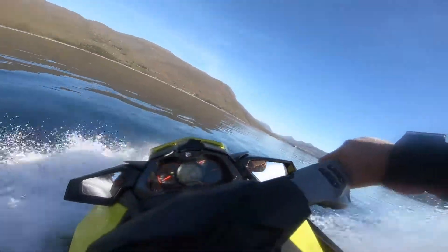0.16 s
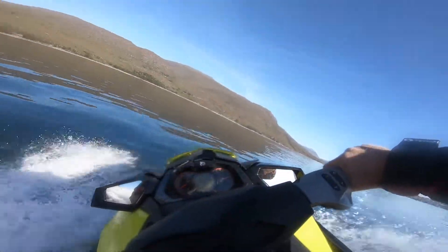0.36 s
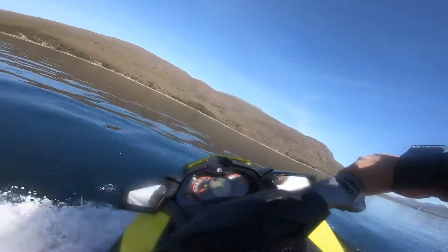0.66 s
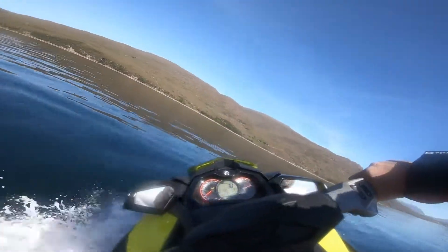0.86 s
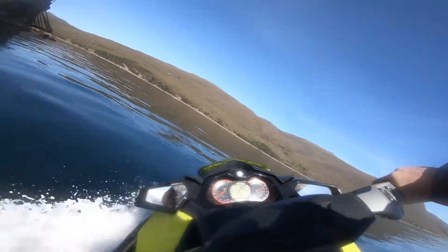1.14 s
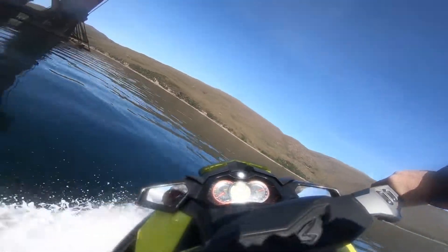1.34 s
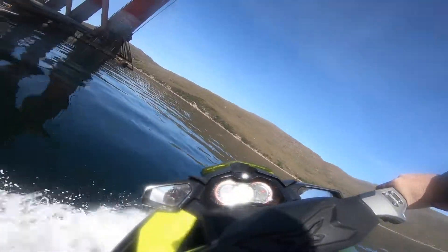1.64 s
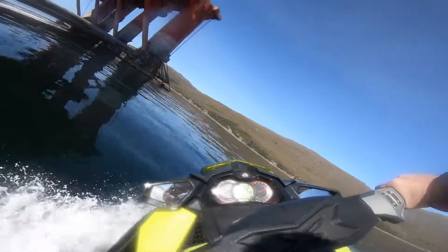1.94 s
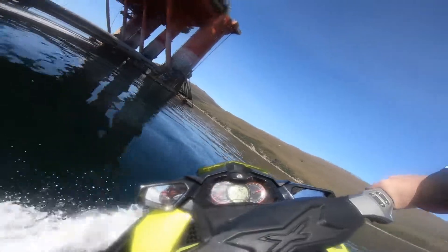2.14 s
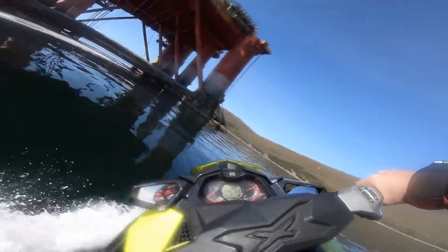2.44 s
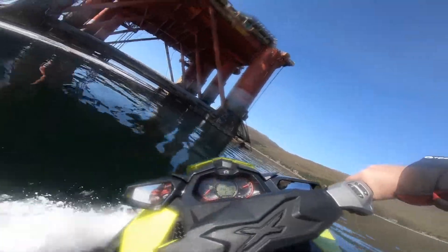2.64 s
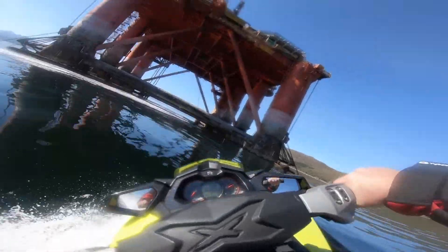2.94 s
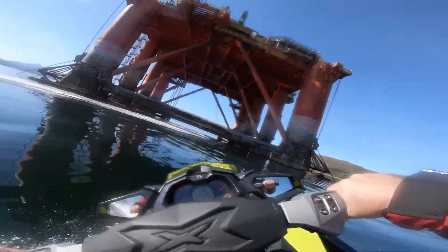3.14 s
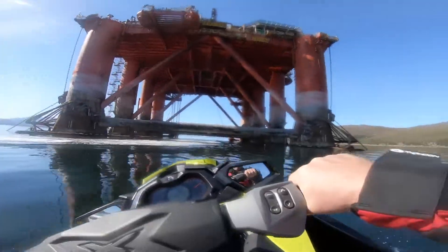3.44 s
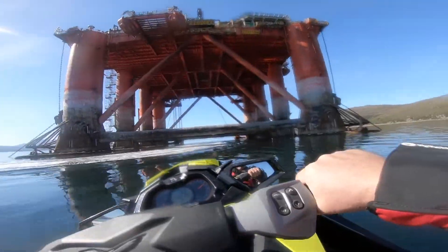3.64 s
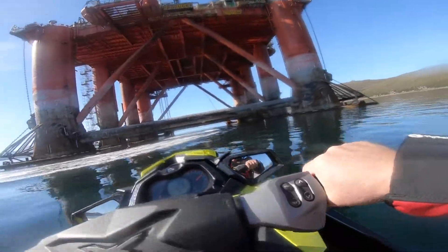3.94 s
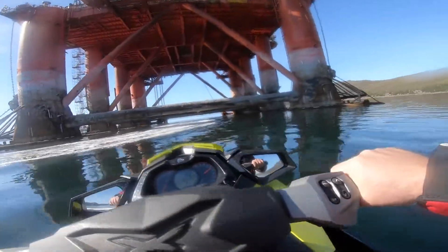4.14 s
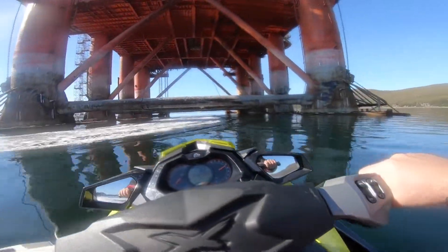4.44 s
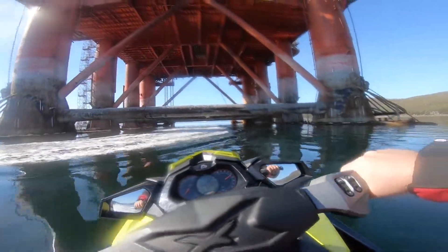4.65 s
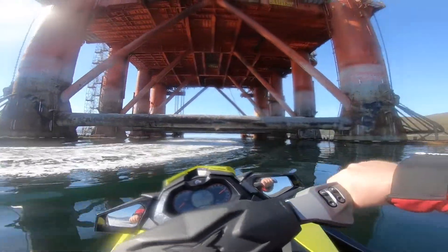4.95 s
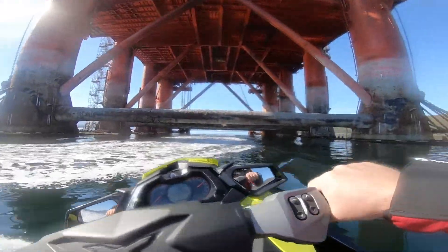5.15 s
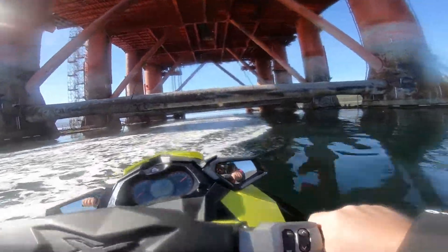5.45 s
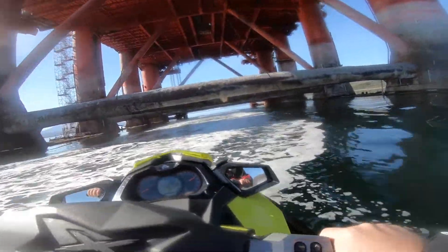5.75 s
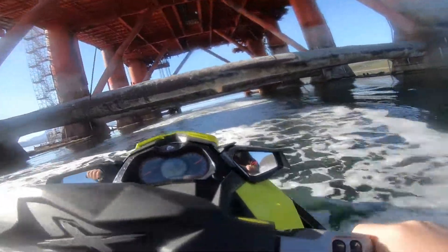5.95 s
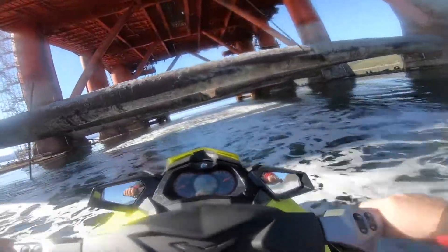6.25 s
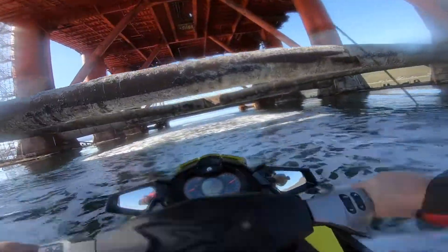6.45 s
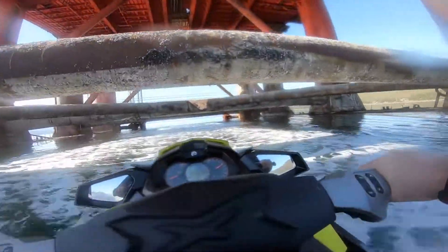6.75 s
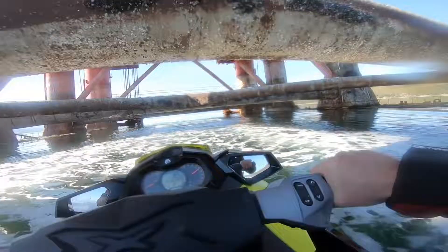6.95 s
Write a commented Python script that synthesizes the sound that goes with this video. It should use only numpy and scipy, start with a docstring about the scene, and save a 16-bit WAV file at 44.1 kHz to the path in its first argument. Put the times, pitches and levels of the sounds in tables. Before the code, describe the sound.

A jet ski is heard close up from the rider's seat on open water. At first the engine runs rough, half buried in churning water, hissing spray and repeated slaps of chop on the hull, while wind rumbles on the microphone. About halfway through it clears into a steady drone with a light whine. One hard knock hits the hull, foam sloshes, and the engine starts to race at the very end.

```python
"""A jet ski's three-cylinder engine, heard close up from a microphone at the rider's seat.
It runs rough and half buried in churning water through a turn, drones cleanly once the hull is level,
and races up as the throttle opens at the very end. Just below, chop slaps the hull, foam sloshes
at the bow and the deck takes one hard knock. Spray hisses past and wind buffets the microphone."""
import sys
import numpy as np
from scipy import signal
from scipy.io import wavfile

SR = 44100
rng = np.random.default_rng(int(sys.argv[2]) if len(sys.argv) > 2 else 0)


def inscribe(sig):
    """Save sig as 16-bit PCM at rate SR to the path in sys.argv[1].

    A 1-D sig is mono; a 2-D sig holds one channel per row.
    Samples are clipped to [-1, 1] before scaling.
    """
    pcm = np.round(np.clip(np.atleast_2d(sig).T, -1, 1) * 32767)
    wavfile.write(sys.argv[1], SR, pcm.astype(np.int16))


N = 313017
THROTTLE_S, REV_OCTAVES_PER_S = 6.92, 2.35
UPRIGHT_S, UPRIGHT_LENGTH_S = 3.36, 0.65  # the hull comes upright and the water briefly lets go


def from_db(db):
    """Decibels to gain."""
    return 10 ** (np.asarray(db) / 20)

def rms_one(x):
    """Scale to rms 1."""
    return x / np.sqrt(np.mean(x ** 2) + 1e-20)

def in_time(rows):
    """A curve of (seconds, value) points, at every sample."""
    return np.interp(np.arange(N) / SR, *np.transpose(rows))

def swell(s, length_s):
    """A bell of height 1 around s, length_s wide at half height."""
    return .5 ** ((2 * (np.arange(N) / SR - s) / length_s) ** 2)

def swells(rows):
    """Gain of a run of swells, each with a centre and length in seconds and a level in dB."""
    return sum(from_db(db) * swell(s, length_s) for s, length_s, db in rows)

def drift(rate):
    """Slow random wander of spread 1: noise through a double one-pole low-pass."""
    r = np.exp(-80 * np.pi * rate / SR)
    slow = signal.lfilter([1], [1, -2 * r, r * r], rng.standard_normal(N // 40 + 2002))[2000:]
    return np.interp(np.arange(N) / 40, np.arange(len(slow)), rms_one(slow))

def band(x, low_hz, high_hz):
    """Butterworth band-pass."""
    sos = signal.butter(2, [low_hz, min(high_hz, .48 * SR)], "band", fs=SR, output="sos")
    return signal.sosfilt(sos, x + 1e-18)

def muffle(x, edge_hz, order=10):
    """Steep low-pass."""
    return signal.sosfilt(signal.butter(order, edge_hz, fs=SR, output="sos"), x + 1e-18)

def resonate(x, hz, width_hz):
    """A resonance with gain 1 at its peak."""
    r = np.exp(-np.pi * width_hz / SR)
    feedback = [1, -2 * r * np.cos(2 * np.pi * hz / SR), r * r]
    return signal.lfilter(np.array([1, 0, -1]) * (1 - r * r) / 2, feedback, x + 1e-18)

def ring(x, hz, t60):
    """A unit click sets a sine of height 1 ringing."""
    r, w = from_db(-60 / (t60 * SR)), 2 * np.pi * hz / SR
    return signal.lfilter([0, np.sin(w)], [1, -2 * r * np.cos(w), r * r], x + 1e-18)

def narrow_noise(hz, width_hz):
    """Noise twice through one resonance; rms 1."""
    return rms_one(resonate(resonate(rng.standard_normal(N), hz, width_hz), hz, width_hz))

def grains(per_s, spread_db):
    """Random impacts, many small and a few large; rms 1."""
    sizes = from_db(spread_db * np.minimum(rng.exponential(1, N), 4)) * rng.choice([-1, 1], N)
    return rms_one(sizes * (rng.random(N) < per_s / SR))

def coloured(spectrum, patchy_db, flutter_rate, impacts=0):
    """Third-octave bands of noise plus impacts, each fluttering by patchy_db; rms 1."""
    hz, db = np.transpose(spectrum)
    edges = 16 * 2 ** (np.arange(31) / 3)
    drive, out = rng.standard_normal((2, N)) + impacts, 0
    for k, (low, high) in enumerate(zip(edges, edges[1:])):
        centre, flutter = np.sqrt(low * high), drift(flutter_rate)
        if hz[0] <= centre <= hz[-1]:
            band_db = np.interp(np.log(centre), np.log(hz), db) + patchy_db * flutter
            out = out + from_db(band_db) * band(drive[k % 2], low, high)
    return rms_one(out)


# The hull's lean. Each row: time in seconds, lean from 1 (in the turn) to 0 (level).
LEAN = [(2.8, 1), (3.65, 0)]
def by_lean(level, turn):
    """Glide between the value when running level and the value in the turn."""
    return level + (turn - level) * in_time(LEAN)

def revs():
    """Octaves that the engine has climbed since the throttle opened."""
    return REV_OCTAVES_PER_S * np.maximum(np.arange(N) / SR - THROTTLE_S, 0)

# Engine speed before the throttle's rise. Each row: time in seconds, four-stroke cycles per second.
CRUISE_SPEED = [(0, 44.5), (.4, 43.5), (.62, 46.5), (.76, 46), (.95, 46.9), (2.1, 47.1), (2.58, 46.4),
                (3.25, 47.7), (4.4, 47.9), (5.3, 48.1), (6.8, 48.2)]
def engine_cycles():
    """Running count of engine cycles; the load on the pump makes the speed waver."""
    speed = in_time(CRUISE_SPEED) * 2 ** revs()
    return np.cumsum(speed * (1 + 0.0014 * drift(11))) / SR

def roughness():
    """How much the engine's tones shake; it climbs as the racing pump claws at the water."""
    return by_lean(level=0.46, turn=0.37) + 1.8 * revs()

def partial(cycle, multiple, shake):
    """One multiple of the cycle rate, unsteady in height and phase; rms 1."""
    depth = shake * roughness()
    phase = 2 * np.pi * (multiple * cycle + rng.random())
    tone = (1 + depth * drift(21)) * np.cos(phase) + depth * drift(13) * np.sin(phase)
    return np.sqrt(2 / (1 + 2 * depth ** 2)) * tone

def overtones(cycle, rows, shake, fade_db=2.5):
    """Multiples of the cycle rate that each fade in and out as the hull rolls."""
    return sum(from_db(db + fade_db * drift(1.8)) * partial(cycle, k, shake) for k, db in rows)


# The firing note, just behind the seat. Each row: time in seconds, base level in dB.
FIRING_LEVEL = [(0, -27), (2.9, -29.5), (3.3, -20.5), (3.5, -15), (3.8, -17), (4.25, -14.5), (4.55, -17),
                (4.9, -16.5), (5.3, -19), (5.8, -18), (6.4, -19), (6.6, -17), (6.95, -13.5), (7.03, -28),
                (7.09, -11.5)]
# Waves cover the outlet and choke the note. Each row: centre and length in seconds, dip in dB.
CHOKES = [(3.2, .12, -3.5), (3.33, 0.031, -22), (3.638, 0.044, -9), (4.362, 0.099, -2), (4.76, 0.12, -9),
          (4.932, 0.046, -5), (5.105, 0.035, -8), (5.2, 0.074, -6), (5.58, 0.087, -2), (5.895, .1, -1),
          (6.31, 0.056, -7.5), (6.795, 0.13, -9.5), (6.994, 0.026, -14)]
# The note's octave swells. Each row: centre and length in seconds, base level in dB.
OCTAVE_SWELLS = [(.25, 0.45, -32), (3.66, 0.37, -18.5), (4.46, 0.082, -24), (4.72, 0.034, -34),
                 (4.91, 0.071, -29), (5.04, 0.21, -23.5), (5.24, 0.084, -15.5), (5.39, 0.11, -24.5),
                 (5.72, 0.1, -28), (5.85, 0.12, -26.5), (6.12, 0.14, -29), (6.25, 0.061, -20.5),
                 (6.42, .1, -20.5), (6.66, 0.2, -19.5), (6.89, 0.11, -19)]
# The exhaust's throb. Each row: multiple of the cycle rate, relative level in dB.
THROB = [(1, -13.5), (2, -1.5), (4, 2), (5, 1.5)]
def exhaust(cycle):
    """Three firings a cycle make the note; unequal cylinders throb on the multiples around it."""
    rough = roughness()
    choke_db = sum(db * swell(s, length_s) for s, length_s, db in CHOKES)
    note = from_db(in_time(FIRING_LEVEL) + choke_db - 3.2 * rough) * partial(cycle, 3, shake=0.49)
    octave_gain = (from_db(-34) + swells(OCTAVE_SWELLS)) * from_db(-2.2 * rough)
    octave = octave_gain * partial(cycle, 6, shake=0.74)
    in_open_db = 15.5 * swell(3.68, 0.73)  # the outlet clears the water as the hull rights itself
    throb_db = by_lean(level=-35, turn=-31.5) + in_open_db + 19 * revs() - 11.1 * rough
    throb = from_db(throb_db) * sum(from_db(db) * partial(cycle, round(k), shake=0.9) for k, db in THROB)
    return muffle(note + octave + throb, edge_hz=329.7)  # the water-filled silencer

# Engine overtones from under the seat. Each row: multiple of the cycle rate, relative level in dB.
PANEL_BUZZ = [(7, -3), (9, -1.5), (10, 0), (11, -6), (13, -11), (15, -7.5), (16, -8.5), (18, -9.5),
              (19, -13.5), (20, -17), (21, -17), (22, -16), (24, -13.5), (26, -14), (27, -14.5), (28, -16),
              (30, -19.5), (34, -22), (36, -19), (37, -21.5)]
def panel_buzz(cycle):
    """The engine's higher multiples reach the air through the panels."""
    upright_db = -8.5 * swell(UPRIGHT_S, UPRIGHT_LENGTH_S)
    rasp_db = 2.5 * swell(4.6, 2)  # on smooth water the panels rasp more freely
    level_db = by_lean(level=-38, turn=-43.5) + upright_db + rasp_db + 5 * revs()
    return from_db(level_db) * rms_one(overtones(cycle, PANEL_BUZZ, shake=0.72))

# Gusts right on the microphone. Each row: time in seconds, level in dB.
GUSTS = [(0, -20), (.18, -17), (.4, -21), (.85, -18.5), (1.25, -25.5), (1.45, -23.5), (1.92, -24.5),
         (2.1, -18), (2.45, -20), (2.85, -19.5), (3.2, -23.5), (3.62, -32), (4.15, -24.5), (4.35, -24.5),
         (5.6, -23.5), (6.05, -24.5), (6.68, -28), (6.85, -20), (7.1, -22)]
# Their rumble. Each row: frequency in Hz, relative density in dB.
WIND_SPECTRUM = [(15, -12.5), (30, -4.5), (55, -1.5), (90, 3), (125, 0), (180, -11.5), (300, -22),
                 (600, -51.5)]
def wind():
    """Turbulent air buffets the microphone with a low rumble."""
    return from_db(in_time(GUSTS)) * coloured(WIND_SPECTRUM, patchy_db=0, flutter_rate=6.1)

def dulled(water):
    """Soften the water's treble, more so where the turn throws it aside."""
    turning = in_time(LEAN)
    thrown_aside = muffle(turning * water, edge_hz=8200, order=3)
    return muffle(thrown_aside + (1 - turning) * water, edge_hz=10130)

# Water along the hull, just below the rider. Each row: time in seconds, base level in dB.
WASH_LEVEL = [(0, -31), (.15, -37.5), (.72, -38), (1.05, -41), (1.45, -40), (2.2, -36.5), (2.85, -38),
              (3.15, -39.5), (3.75, -40.5), (4.4, -40), (5.3, -37), (5.45, -38.5), (5.95, -37.5),
              (6.25, -38.5), (6.6, -35.5), (6.95, -37.5)]
# Its colour in the turn and running level. Each row: frequency in Hz, relative density in dB.
TURN_SPECTRUM = [(350, -9.5), (600, 4), (880, -0.5), (1150, -9), (1450, -10), (1800, -12), (2300, -22.5),
                 (3000, -39), (4500, -18)]
CRUISE_SPECTRUM = [(350, 0.5), (600, 5), (850, -1.5), (1080, -4.5), (1300, -2), (1500, -7), (1800, -7.5),
                   (2200, -11.5), (2800, -24.5), (3500, -39.5), (5000, -42.5)]
def wash(cycle):
    """Water rushes past the hull, in lumps through the turn and evenly when level."""
    turning = in_time(LEAN)
    lumps = rms_one(from_db(0.9 * drift(29)))
    coarse_drops = 0.42 * grains(per_s=310, spread_db=0.5)
    carving = lumps * coloured(TURN_SPECTRUM, patchy_db=-1, flutter_rate=12, impacts=coarse_drops)
    fine_drops = 0.1 * grains(per_s=1200, spread_db=13.5)
    gliding = coloured(CRUISE_SPECTRUM, patchy_db=1.5, flutter_rate=12, impacts=fine_drops)
    blend = np.sqrt(turning) * carving + np.sqrt(1 - turning) * gliding
    pulsing = 1 + 0.036 * np.cos(2 * np.pi * cycle)  # the jet surges once an engine cycle
    rush = from_db(in_time(WASH_LEVEL)) * pulsing * blend
    body_loss = 1 - from_db(-3.5 * swell(3.5, 1.8))  # on smooth water the wash thins
    return dulled(rush - body_loss * resonate(rush, hz=620, width_hz=400))

# Churning water close astern. Each row: frequency in Hz, relative density in dB.
CHURN_SPECTRUM = [(80, -23), (130, -5), (190, 1), (290, -3), (360, -9.5), (480, -12.5), (650, -45.5),
                  (1000, -47.5), (2000, -52.5)]
def churn():
    """Water boils dully behind the jet, rising with the wash and the revs."""
    wash_db = in_time(WASH_LEVEL)
    upright_db = -5 * swell(UPRIGHT_S, UPRIGHT_LENGTH_S)
    level_db = by_lean(level=-26, turn=-28) + wash_db - wash_db.mean() + upright_db + 7 * revs()
    return from_db(level_db) * coloured(CHURN_SPECTRUM, patchy_db=4, flutter_rate=13.7)

# Spray passing the microphone. Each row: centre and length in seconds, hiss and top hiss in dB.
SHEETS = [(0.033, 0.37, -63, -110), (0.801, 0.64, -78.5, -110), (2.091, 1.4, -63.5, -110),
          (3.756, .45, -75.5, -100), (4.215, 0.47, -63.5, -80.5), (4.705, 0.75, -67, -67.5),
          (4.945, 0.24, -60, -65), (5.274, 0.071, -52.5, -65), (5.3, 0.58, -71, -63.5),
          (5.82, 0.45, -63, -84), (6.575, 0.31, -55.5, -76.5), (7.053, 0.27, -62, -92)]
# The colour of the hiss and of the top hiss. Each row: frequency in Hz, relative density in dB.
HISS_SPECTRUM = [(1800, -12), (2800, 4), (3500, 1), (4200, 3), (5200, 3.5), (6000, 2.5), (6800, 4),
                 (7500, -2.5), (8400, -9.5), (9300, -12), (10500, -17)]
TOP_HISS_SPECTRUM = [(6000, -9.5), (8500, -.5), (11000, -16), (13000, -4), (14500, -6.5), (16000, -13.5)]
def spray():
    """Droplets hiss, swelling as sheets pass; a faint, very high hiss comes and goes with the swells."""
    steady_db = by_lean(level=-58, turn=-62.5) - 0.5 * swell(UPRIGHT_S, UPRIGHT_LENGTH_S)
    hiss_gain = from_db(steady_db) + swells((s, length_s, db) for s, length_s, db, _ in SHEETS)
    top_gain = swells((s, length_s, db) for s, length_s, _, db in SHEETS)
    droplets = 0.12 * grains(per_s=3000, spread_db=6)
    hiss = hiss_gain * coloured(HISS_SPECTRUM, patchy_db=1.53, flutter_rate=13, impacts=droplets)
    top_hiss = top_gain * coloured(TOP_HISS_SPECTRUM, patchy_db=1, flutter_rate=20)
    return dulled(hiss) + top_hiss

def spatter(hits, rise_s):
    """Noise that swells to the size of each hit in rise_s, then dies."""
    r = np.exp(-1 / (rise_s * SR))
    return rng.standard_normal(N) * signal.lfilter([np.e * (1 - r)], [1, -2 * r, r * r], hits + 1e-18)

def strike(hits, modes):
    """Every hit rings each mode with a strength of its own."""
    return sum(ring(hits * from_db(db + 0.89 * drift(33)), hz, t60) * (-1) ** k
               for k, (hz, db, t60) in enumerate(modes))

# Chop on the hull, underfoot. Each row: start in seconds, then thump, smack, splash and crack in dB.
SLAPS = [(0.014, -16, -11, -26, -42), (0.045, -25, -21, -28, -60), (.088, -27, -22, -11, -58),
         (.141, -23, -26, -14, -56), (.456, -15.5, -25, -25, -66), (0.534, -15, -20, -24, -66),
         (0.709, -16, -19, -19.5, -65), (.746, -13, -17, -27, -66), (.923, -13, -19, -27, -65),
         (0.974, -13.5, -25, -32, -63), (1.293, -11.5, -15, -31, -65), (1.38, -14.5, -19, -21, -60),
         (1.674, -15, -15.5, -28, -66), (2.154, -11, -15, -13.5, -63), (2.184, -15, -20, -32, -66),
         (2.244, -14, -17, -22.5, -62), (2.516, -15.5, -21, -31, -66), (2.8, -14.5, -16, -18, -64),
         (5.264, -2, -29, -24, -30), (5.296, -16, -25, -23, -44), (5.987, -18, -23, -21, -53),
         (6.127, -17, -23, -38, -64), (6.838, -24, -13, -23, -55)]
# The hull's ring under a thump and a splash. Each row: frequency in Hz, gain in dB, t60 in seconds.
HULL_MODES = [(140, -3.5, 0.036), (234, -1.5, 0.031), (362, -8, 0.044), (504, -7, 0.023), (605, -8, 0.012),
              (870, -18, 0.027)]
SPLASH_MODES = [(710, -12, 0.0092), (1160, -11, 0.017), (1770, -18.5, 0.0071), (2380, -29.5, 0.0094)]
def slaps():
    """Each wave smacks, splashes, throws cracking droplets and, a moment later, thumps the panels."""
    pushes, smacks, bursts, cracks = np.zeros((4, N))
    for s, thump_db, smack_db, splash_db, crack_db in SLAPS:
        i = round(s * SR)
        pushes[round((s + .003) * SR)] = from_db(thump_db)
        smacks[i], bursts[i], cracks[i] = from_db([smack_db, splash_db, crack_db])
    thump = strike(pushes + 0.059 * spatter(pushes, rise_s=0.003), HULL_MODES)
    splash = strike(bursts + 0.046 * spatter(bursts, rise_s=0.0027), SPLASH_MODES)
    splash += 0.3 * band(spatter(bursts, rise_s=0.0017), 1250, 1940)
    crack = band(spatter(cracks, rise_s=0.002), 3900, 8700)
    smack = band(spatter(smacks, rise_s=0.0019), 530, 1020)
    pop = from_db(-8) * ring(smacks, hz=740, t60=.011)  # air trapped under the hull
    return thump + splash + smack + pop + muffle(crack, edge_hz=9200)

# Surges under the hull. Each row: centre and length in seconds, pitch and width in Hz, level in dB.
DIGS = [(0.498, 0.83, 430, 218, -37), (1.655, 0.76, 180, 119, -24), (2.653, 0.83, 208, 90.5, -28.5),
        (4.3, .7, 1280, 300, -50), (5.8, 0.68, 655, 221, -41.5), (6.602, 0.81, 209, 60, -29)]
def hull_digs():
    """As the hull digs in, the water booms and rushes under it."""
    return sum(from_db(db) * swell(s, length_s) * narrow_noise(hz, width_hz)
               for s, length_s, hz, width_hz, db in DIGS)

# The pump's snarl at the stern. Each row: multiple of the cycle rate, relative level in dB.
SNARL = [(10, -3), (12, -1.5), (17, -10), (19, -6), (22, -15), (24, -23), (36, -25)]
def pump_snarl(cycle):
    """The pump draws air, most of all in the middle of the turn."""
    return from_db(-42) * swell(1.92, 2.23) * overtones(cycle, SNARL, shake=0.95)

# Foam at the bow, just ahead. Each row: centre and length in seconds, level in dB.
SLOSHES = [(2.95, 0.6, -49), (5.77, 0.11, -43), (5.87, 0.037, -43.5), (6.0, 0.079, -46), (6.7, 0.19, -46),
           (7.09, 0.047, -36)]
# The foam's colour. Each row: frequency in Hz, relative density in dB.
FOAM_SPECTRUM = [(950, -2), (1400, 4.5), (1800, -4), (2300, -13.5), (3000, -12), (4500, -21)]
def sloshes():
    """Foam breaks at the bow in short surges full of bursting bubbles."""
    bubbles = grains(per_s=870, spread_db=5)
    return swells(SLOSHES) * coloured(FOAM_SPECTRUM, patchy_db=2.5, flutter_rate=24, impacts=bubbles)

# The impeller, heard from the seat. Each row: time in seconds, level in dB.
WHINE_LEVEL = [(3.5, -59), (3.85, -54), (3.98, -38), (4.3, -38), (4.72, -43), (4.92, -49), (5.6, -47.5),
               (7.1, -52)]
def impeller_whine(cycle):
    """Blades locked to the crank make a whine that comes forward once the hull is level."""
    return from_db(in_time(WHINE_LEVEL)) * partial(cycle, 12, shake=0.4)

# The deck, within arm's reach. Each row: frequency in Hz, level in dB, t60 in seconds.
DECK_MODES = [(1140, -11.5, .021), (1820, -16, .018), (2200, -24, .009)]
def deck_knock(start_s=5.2645):
    """A hard contact sets the stiff deck ringing briefly."""
    hit = np.zeros(N)
    hit[round(start_s * SR)] = 1
    return sum(ring(hit * from_db(db), hz, t60) * (-1) ** k for k, (hz, db, t60) in enumerate(DECK_MODES))

# Howls from the intake, close by. Each row: centre and length in seconds, level in dB.
HOWLS = [(5.4, 0.21, -37), (6.35, 1, -37.5), (6.985, 0.066, -24)]
def intake_howl(cycle):
    """Under load the intake howls on one multiple of the cycle rate."""
    return swells(HOWLS) * partial(cycle, 8, shake=0.8)

def high_sizzle():
    """A narrow, high sizzle swells in the spray hiss toward the end."""
    return from_db(-65) * swell(6.8, 1.1) * narrow_noise(hz=6900, width_hz=400)

def exhaust_growl(cycle):
    """Just after the throttle opens, the exhaust growls at the crank rate."""
    return from_db(-20) * swell(THROTTLE_S + 0.12, .08) * partial(cycle, 2, shake=.6)


def scene():
    """Engine, wind and water, all close to one microphone at the rider's seat."""
    cycle = engine_cycles()
    engine = exhaust(cycle) + panel_buzz(cycle) + impeller_whine(cycle)
    engine += pump_snarl(cycle) + intake_howl(cycle) + exhaust_growl(cycle)
    rumble = wind() + churn() + hull_digs()
    rush = wash(cycle) + spray() + high_sizzle() + sloshes()
    return (engine + rumble + rush + slaps() + deck_knock())[None]

def record(dry, cutoff_hz=15700):
    """The camera at the seat cuts the highest treble."""
    return signal.sosfilt(signal.cheby2(12, 70, cutoff_hz, fs=SR, output="sos"), dry)


dry = scene()
out = record(dry)
inscribe(out)
```